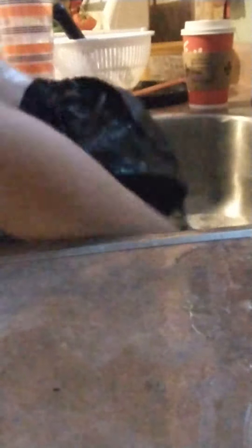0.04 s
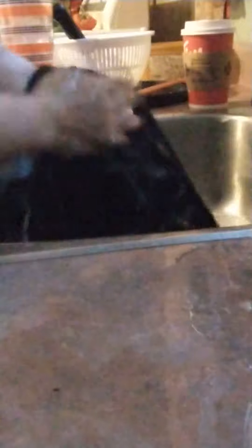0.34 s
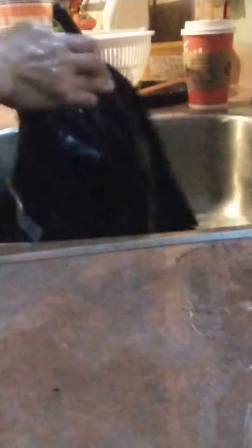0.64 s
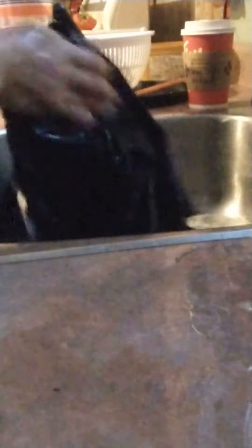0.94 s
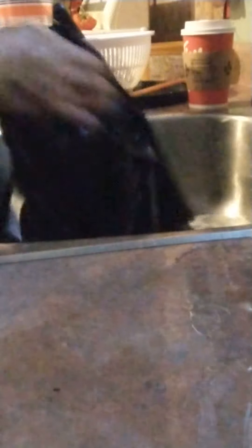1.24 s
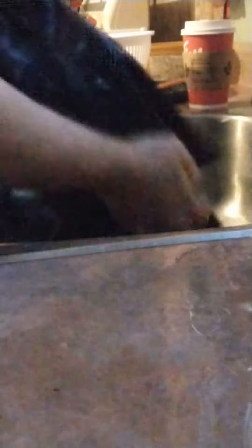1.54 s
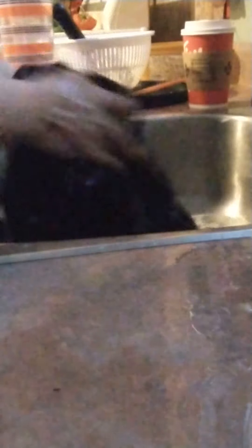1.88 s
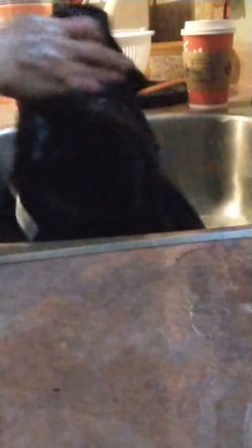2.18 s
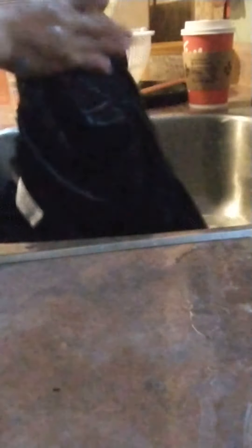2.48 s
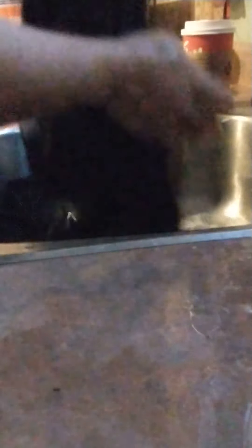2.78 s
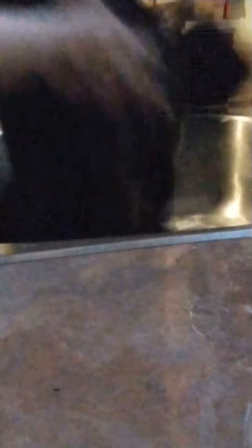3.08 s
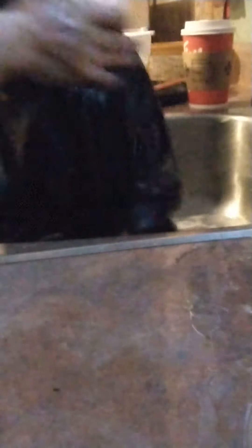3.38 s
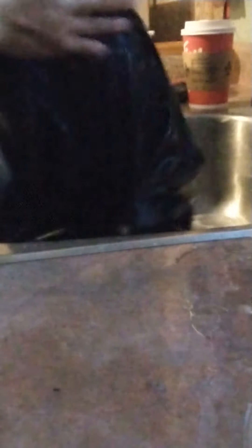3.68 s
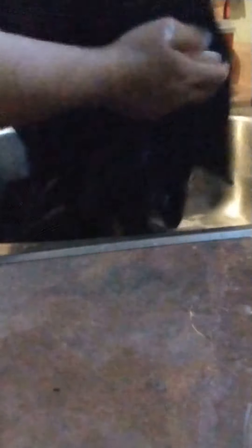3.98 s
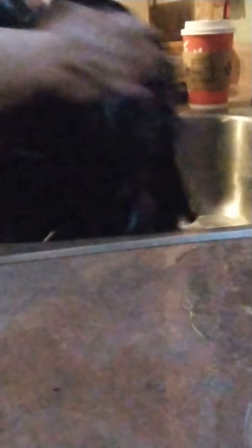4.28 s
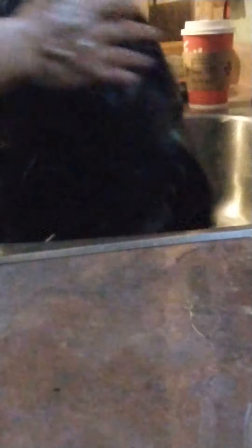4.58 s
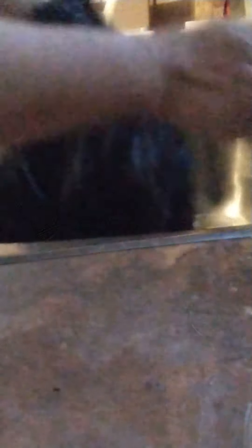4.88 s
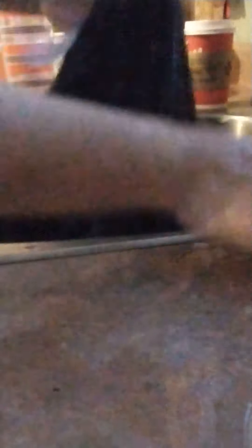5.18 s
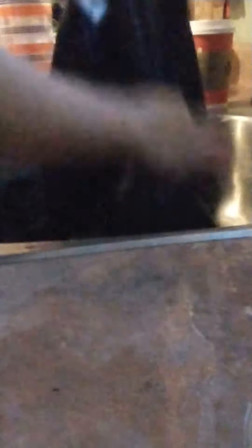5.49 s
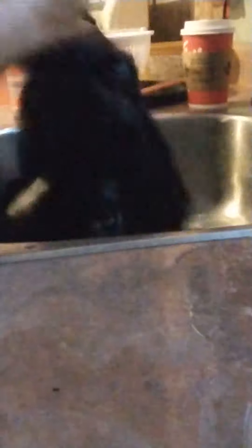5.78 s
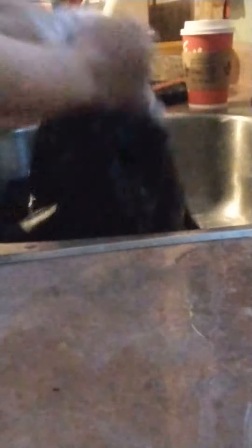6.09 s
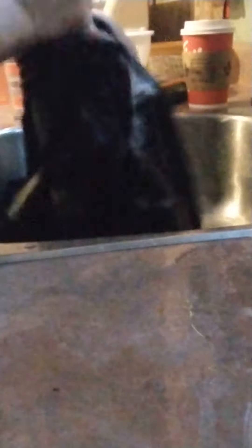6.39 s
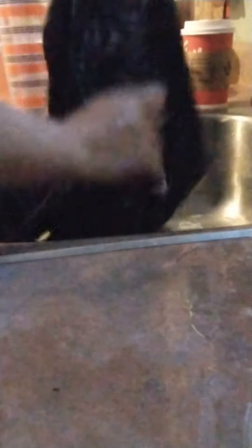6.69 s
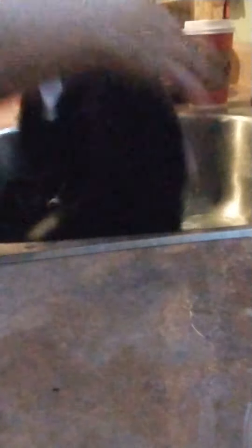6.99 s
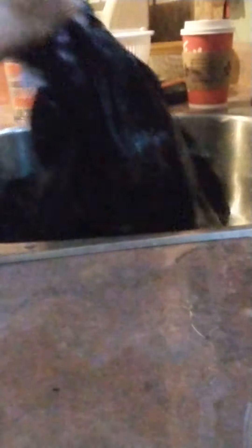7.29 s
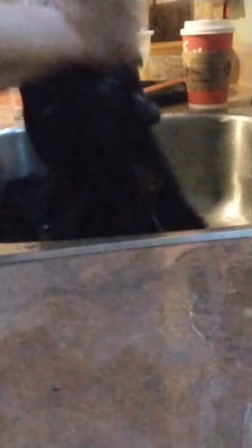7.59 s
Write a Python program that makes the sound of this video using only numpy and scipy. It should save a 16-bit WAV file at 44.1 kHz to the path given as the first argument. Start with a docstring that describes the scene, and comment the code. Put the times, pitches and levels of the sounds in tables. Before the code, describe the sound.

Close to a steel sink in a quiet kitchen, hands scrub a bundle of soapy fabric, gently at first and then more firmly. The strokes swish and squelch, water gurgles through the cloth and wet folds slap down softly. One sharp, hollow knock with a quick rattle, much louder than the washing, comes from the basin before the scrubbing resumes. An appliance hums faintly underneath.

```python
"""A steel kitchen sink, close up, where wet clothes are being rubbed by hand.
Each stroke drags soapy fibres past each other, pushes water through the weave and shifts the heavy
bundle. Suds squelch, water squirts from squeezed folds and wet cloth flops on the basin. Once, the hand
knocks something hard against the sink, where it bounces. An appliance hums in the quiet room."""
import sys
import numpy as np
from scipy import signal
from scipy.fft import rfft, irfft, next_fast_len
from scipy.io import wavfile

SR = 44100
rng = np.random.default_rng(int(sys.argv[2]) if len(sys.argv) > 2 else 0)


def wav_record(signal):
    """Record a signal, one row per channel, as 16-bit PCM in the file named by sys.argv[1]."""
    frames = np.transpose(np.atleast_2d(signal))
    bounded = np.clip(frames, -1, 1)
    # unit amplitude maps onto the largest positive 16-bit level
    quanta = np.round(bounded * 32767).astype(np.int16)
    wavfile.write(sys.argv[1], SR, quanta)


N = 346185
TIME = np.arange(N) / SR
TAPS = 2048
FREQS = np.maximum(np.arange(TAPS // 2 + 1) * SR / TAPS, 1)

# the hand draws over the cloth: at_speed_s, hold_s, rub_db, water_db
HAND_STROKES = [(-0.024, 0.18, -70, -79), (0.43, 0.017, -70.5, -85), (0.52, 0.079, -68, -80.5),
                (0.719, 0.037, -61.5, -69), (0.902, 0.005, -53.5, -67.5), (1.049, 0.035, -57.5, -71),
                (1.226, 0.0097, -57, -65.5), (1.379, 0.035, -59, -68), (1.539, 0.072, -59.5, -80),
                (1.662, 0.089, -67.5, -73.5), (1.838, 0.03, -54.5, -61), (1.989, 0.094, -58.5, -67.5),
                (2.216, 0.064, -58, -67.5), (2.384, 0.073, -60.0, -68), (2.583, 0.032, -57.0, -61.5),
                (2.743, 0.07, -58.5, -66), (2.881, 0.049, -58, -65), (3.006, 0.033, -60.5, -72),
                (3.117, 0.18, -53.5, -55), (3.389, 0.029, -50.5, -58), (3.555, 0.034, -54, -63),
                (3.743, 0.0044, -52, -58.5), (3.9, 0.18, -56, -66.5), (4.223, 0.085, -57, -61.5),
                (4.422, 0.046, -54.5, -69), (4.588, 0.045, -55, -65), (4.772, 0.12, -61, -66),
                (4.994, 0.079, -65.5, -75.0), (5.137, 0.15, -72.5, -77.5), (5.415, 0.16, -73.5, -72),
                (5.611, 0.065, -58, -63.5), (5.8, 0.2, -63, -62.5), (6.121, 0.096, -51.0, -53),
                (6.482, 0.038, -58.5, -59.0), (6.655, 0.066, -55, -58), (6.791, 0.055, -51.5, -57),
                (6.997, 0.46, -61, -66.5), (7.431, 0.18, -56, -54.5), (7.804, 0.084, -54.5, -56.5)]
# the bundle is turned or pushed along the basin: at_speed_s, hold_s, level_db
BUNDLE_HEAVES = [(0.012, 0.062, -63.5), (0.402, 0.0042, -64.5), (1.848, 0.0058, -57.5), (1.99, 0.005, -67),
                 (3.119, 0.2, -58), (3.392, 0.0035, -55.5), (4.0, 0.13, -65), (4.253, 0.065, -60),
                 (4.444, 0.056, -65), (4.61, 0.004, -59.5), (4.825, 0.005, -59), (5.003, 0.054, -63.0),
                 (5.555, 0.12, -64.5), (5.779, 0.16, -59.5), (6.049, 0.21, -69.5), (6.665, 0.03, -62.5),
                 (7.108, 0.13, -61.5)]
# suds snap in a fold: start_s, level_db, pitch_hz, width_octaves
SUDS_SQUELCHES = [(0.887, -42.5, 5500, 2), (1.538, -42, 2470, 1.5), (1.576, -43, 2380, 1.3),
                  (1.981, -45, 2900, 1), (2.636, -38.5, 4800, 1.1), (2.65, -36, 5030, 1.4),
                  (2.654, -41, 4130, 0.6), (2.68, -35.5, 3900, .6), (2.755, -41.5, 4200, 2.3),
                  (2.799, -39.5, 4160, 2.1), (2.814, -39, 4150, 0.9), (3.053, -42.5, 4530, 3.1),
                  (3.12, -33, 3160, 1.9), (3.76, -33, 4840, 1.64), (3.88, -36, 5640, 1.25),
                  (4.005, -42, 2400, 1.7), (4.291, -32.5, 4150, 2.4), (4.809, -38.5, 3900, 1.9),
                  (5.149, -59.5, 9020, 1), (5.477, -56, 5540, 1.4), (5.662, -44.5, 4500, 1.8),
                  (6.066, -45.5, 7200, 1.1), (6.104, -36, 6500, 1.1), (6.46, -46, 4500, 2.6),
                  (6.513, -41.5, 2610, 1.7), (6.818, -44, 3000, 6.6), (7.411, -40.5, 6060, 0.4)]
# soapy water leaves a squeezed fold: start_s, level_db, pitch_hz, length_s
WATER_SQUIRTS = [(0.046, -47.5, 1460, 0.034), (0.375, -56, 1640, 0.077), (1.368, -46, 3200, 0.07),
                 (1.79, -40.5, 2430, 0.097), (2.434, -42, 2560, 0.029), (3.192, -37.5, 2210, 0.11),
                 (3.711, -43, 2380, 0.056), (6.102, -33.5, 4560, 0.14), (6.796, -50, 2180, 0.095),
                 (7.436, -44.5, 6400, 0.18), (7.559, -42.5, 1980, 0.065)]
# wet folds land on the basin: start_s, level_db, pitch_hz
FOLD_FLOPS = [(0.056, -58, 444), (0.411, -48.5, 364), (1.689, -51.5, 239), (1.849, -44, 220),
              (1.986, -45, 482), (2.318, -57.5, 290), (2.447, -46, 990), (2.888, -50.5, 370),
              (3.136, -45, 120), (3.157, -48, 238), (3.24, -42.5, 210), (3.272, -36, 700),
              (3.28, -40.5, 230), (3.396, -39, 726), (4.003, -45.5, 320), (4.244, -46, 440),
              (4.287, -35.5, 700), (4.316, -48, 390), (4.82, -43.5, 540), (5.491, -45, 600),
              (5.618, -46, 378), (5.764, -40.5, 380), (5.785, -60, 360), (5.862, -43, 500),
              (6.708, -46, 330), (7.13, -43.5, 700), (7.209, -41.5, 447)]
# a hard thing hits the sink and bounces: start_s, level_db, cutoff_hz
KNOCK_CONTACTS = [(5.2308, -38, 5000), (5.2903, -26, 1500), (5.2948, -1, 7000), (5.3033, -19, 1300),
                  (5.3113, -9, 2100), (5.3510, -22, 800)]
# pitches heard in the knock, from the ringing sink and the quick bounce: pitch_hz, level_db, base_t60_s
KNOCK_RING = [(135, -22, .26), (205, -24, .22), (302, -5, .2), (358, -7, .19), (466, 2, .17), (608, 4, .19),
              (728, -6, .14), (845, -6, .13), (965, 4, .15), (1086, -5, .12), (1204, -3, .12),
              (1766, -11, .11), (2540, -8, .11), (4010, -12, .07)]
# peaks and dips of the hollow basin: centre_hz, width_hz, gain_db
BASIN_EQ = [(387, 390, 4), (625, 50, -3), (992, 226, 9), (1255, 450, 6.5), (1460, 320, -5.5),
            (2410, 480, 7.5), (3270, 520, -4.5), (4090, 420, 6.5), (4660, 460, 4), (8170, 730, 3.5)]
# the cloth muffles the steel at first, then is lifted clear: time_s, basin_share
BASIN_OPENING = [(0, .2), (.9, .35), (1.5, .7), (1.9, 1)]
# the tone of each layer: frequency_hz, level_db
FIBRE_TONE = [(400, -24.5), (1000, -9), (1700, -2), (2600, 0.5), (4200, -2.5), (6500, -4.5), (8500, -8.5),
              (11000, -12.5), (15500, -24.5)]  # bright rasp
SUDS_TONE = [(1000, -22.5), (2500, -10), (4500, 0), (8000, -6), (12000, -11), (15500, -18.5)]  # crisp top
WATER_TONE = [(350, -23), (650, -0.5), (900, 1), (1300, 4), (2000, -18), (3000, -24), (6000, -30)]  # hollow mids
BUNDLE_TONE = [(30, -30.5), (70, -11), (115, -2.5), (180, -2), (280, -1), (480, 3), (700, -1), (1100, -20),
               (2500, -35)]  # low rumble
CRACK_TONE = [(30, -74), (80, -37), (200, -31), (400, -9.5), (600, -7.5), (1000, -4), (1400, -11.5),
              (1900, -16), (2600, -8.5), (3300, -36), (4000, -15.5), (4700, -35), (7800, -38),
              (10000, -42.5), (15500, -57)]  # hard clack
AIR_TONE = [(20, -38), (32, -28), (50, -10), (80, -10), (130, -5), (170, -13.5), (215, -6.5), (340, -13.5),
            (700, -19), (1200, -24.5), (2400, -22.5), (4750, -27), (11800, -34), (15500, -32.5)]  # dark room air
# how alike left and right are: frequency_hz, likeness (clipped to 0-1)
STEREO_LIKENESS = [(60, 0.63), (400, 1), (1000, 0.65), (2000, 0), (3000, -0.4), (8000, 0.44), (15000, -2.2)]
# where the washing leans: frequency_hz, left_minus_right_db
STEREO_BALANCE = [(100, -4), (400, -1.5), (700, -1.5), (1200, 2.5), (2400, 1.5), (4400, -1.4), (15000, -2)]


def hand_strokes():
    """Each stroke rubs the fibres, squeezes water through the cloth and tugs the bundle along."""
    at_speed_s, hold_s, rub_db, water_db = np.transpose(HAND_STROKES)
    rub = effort(zip(at_speed_s, hold_s, rub_db))
    squeeze = effort(zip(at_speed_s, hold_s, water_db))
    return soapy_fibres() * rub + water_in_weave() * squeeze + shifting_bundle(rub)


def soapy_fibres():
    """Fibres rasp past each other while the foam on them pops and crackles."""
    rasp = slips(FIBRE_TONE, per_s=11000, spread_db=1.5, catch_hz=81, catch_db=1.5)
    foam = bubbles(low_hz=1900, high_hz=10500, per_s=210, cycles=20, spread_db=4, glide=0.1)
    crackle = slips(SUDS_TONE, per_s=290, spread_db=6)
    return rasp + undb(-10.5) * foam + undb(-12.5) * crackle


def water_in_weave():
    """Water pushed through the cloth sloshes and gurgles."""
    slosh = slips(WATER_TONE, per_s=3300, spread_db=2, catch_hz=100, catch_db=2)
    gurgle = bubbles(low_hz=630, high_hz=1332, per_s=80, cycles=34, spread_db=18, glide=0.095)
    return slosh + undb(-3) * gurgle


def shifting_bundle(rub):
    """The heavy wet bundle rumbles when it is heaved or dragged by a stroke."""
    heave = effort(BUNDLE_HEAVES, rise_s=0.016, fall_s=0.032)
    drag = undb(-13.5) * rub
    return slips(BUNDLE_TONE, per_s=830, spread_db=2.5) * np.hypot(heave, drag)


def effort(gestures, rise_s=0.049, fall_s=0.033):
    """Envelope of hand movements: each gathers speed, bears down most midway and runs out."""
    power = np.zeros(N)
    bear_down_db_per_s = 32.5
    for at_speed_s, hold_s, level_db in gestures:
        near = slice(max(int((at_speed_s - 0.5) * SR), 0), int((at_speed_s + hold_s + 0.5) * SR))
        since, until = TIME[near] - at_speed_s, at_speed_s + hold_s - TIME[near]
        ease_s = 0.075 * hold_s  # long movements start and stop more slowly
        fade = np.maximum(-since, 0) / (rise_s + ease_s) + np.maximum(-until, 0) / (fall_s + ease_s)
        pressure_db = bear_down_db_per_s * np.clip(np.minimum(since, until), 0, 0.06)
        power[near] += (undb(level_db + pressure_db) * np.exp(-fade ** 1.67)) ** 2
    return np.sqrt(power)


def slips(tone, per_s, spread_db, catch_hz=0, catch_db=0):
    """Tiny uneven slips and bursts in the basin; catch_db bunches them as the cloth grips and lets go."""
    fired = rng.random((2, N)) < per_s / SR
    sizes = rng.standard_normal((2, N)) * undb(spread_db * rng.standard_normal((2, N)))
    clicks = stereo(fired * sizes) * undb(catch_db * wander(catch_hz))
    covered = colour(clicks, contour(tone))
    basin_share = np.clip(np.interp(TIME, *np.transpose(BASIN_OPENING)), 0, 1)
    return basin_share * unit(colour(covered, basin_db())) + (1 - basin_share) * unit(covered)


def bubbles(low_hz, high_hz, per_s, cycles, spread_db, glide):
    """Small air pockets ring briefly, rising in pitch as they reach the surface."""
    out, t = np.zeros((2, N)), TIME[:SR // 25]
    for when, pitch, size, pan in rng.random((int(per_s * N / SR), 4)):
        hz = low_hz * (high_hz / low_hz) ** pitch
        life_s = cycles / hz
        age = t[:int(life_s * SR) + 2]
        ring = np.sin(2 * np.pi * hz * age * (1 + glide * age / life_s / 2)) * decay(age, life_s)
        sides = np.sqrt([[0.5 + pan], [1.5 - pan]])
        add(out, when * N / SR, undb(spread_db * size ** 2) * sides * ring)
    return unit(colour(out, basin_db()))


def splashes():
    """Wet accents: bright snaps of suds, swelling squirts and dull flops of folds on the basin."""
    out, t = np.zeros((2, N)), TIME[:SR // 4]
    snap = attack(t, 0.00058) * decay(t, 0.061)
    flop = attack(t, 0.0011) * decay(t, 0.049)
    for start_s, level_db, hz, octaves in SUDS_SQUELCHES:
        add(out, start_s, undb(level_db) * spurt(snap, hz, octaves, skirt_db=-37))
    for start_s, level_db, hz, length_s in WATER_SQUIRTS:
        swell = np.sin(np.pi * np.minimum(t / length_s, 1)) ** 2
        add(out, start_s, undb(level_db) * spurt(swell, hz, octaves=0.94, skirt_db=-37))
    for start_s, level_db, hz in FOLD_FLOPS:
        add(out, start_s, undb(level_db) * spurt(flop, hz, octaves=2.27, skirt_db=-38.5))
    return out


def spurt(envelope, hz, octaves, skirt_db):
    """Water films burst together in a puff of noise around one pitch, peak 1."""
    fizz = stereo_noise(len(envelope)) * envelope
    band_db = skirt_db * (1 - np.exp(-(np.log2(FREQS / hz) / octaves) ** 2))
    sound = colour(fizz, band_db + basin_db())
    return sound / np.abs(sound).max()


def sink_knock():
    """Each contact on the cloth-damped sink cracks, rings and sets off a dense rattle in the counter."""
    out, t = np.zeros((2, N)), TIME[:SR // 2]
    # levels as [left, right]
    crack_db, ring_db, rattle_db = [[-1.5], [-9.5]], [[-30.5], [-34.5]], [[-22.5], [-28.5]]
    cloth_damping = 0.8
    crack = colour(signal.unit_impulse(len(t)), contour(CRACK_TONE))
    crack /= np.abs(crack).max()
    ring = sum(undb(level_db) * np.cos(2 * np.pi * hz * t) * decay(t, base_t60_s * cloth_damping)
               for hz, level_db, base_t60_s in KNOCK_RING)
    ring *= attack(t, 0.0054)  # the ring blooms just after the crack
    for start_s, level_db, cutoff_hz in KNOCK_CONTACTS:
        rattle = unit(colour(stereo_noise(len(t)), contour(CRACK_TONE))) * decay(t, 0.13)
        blow = undb(crack_db) * crack + undb(ring_db) * ring + undb(rattle_db) * rattle
        softness_db = -10 * np.log10(1 + (FREQS / cutoff_hz) ** 4)  # a softer contact loses its treble
        add(out, start_s, undb(level_db) * colour(blow, softness_db))
    return from_right(out, delay_samples=7)


def basin_db():
    """The basin's resonances and hollows as an EQ curve over FREQS."""
    return sum(db / (1 + (2 * (FREQS - hz) / width_hz) ** 2) ** 2 for hz, width_hz, db in BASIN_EQ)


def kitchen(sound, wet_db, t60_s):
    """Cupboards and walls add a short wash of reflections."""
    t = TIME[:SR // 2]
    tail = stereo_noise(len(t)) * decay(t, t60_s) * attack(t, 0.0037)
    tail /= np.sqrt(np.sum(tail ** 2) / 2)
    tail = colour(tail, contour([(300, -3), (2500, -0.5), (10000, 3.5)]))
    return sound + undb(wet_db) * signal.oaconvolve(sound, tail, axes=1)[:, :N]


def room_tone(air_db=-72.5, hum_hz=59.3, hum_db=-82.5):
    """A bed of faint steady air and the low, wavering hum of an appliance."""
    air = unit(colour(stereo_noise(N), contour(AIR_TONE)))
    hum = np.sqrt(2) * np.sin(2 * np.pi * hum_hz * TIME)
    return undb(air_db) * air + undb(hum_db + 1.2 * wander(5)) * hum


def stereo(pair):
    """Blend two unrelated signals into left and right: alike in the bass, wide in the treble."""
    n = pair.shape[1]
    size = next_fast_len(n)
    bin_hz = np.arange(size // 2 + 1) * SR / size
    alike = np.interp(bin_hz, FREQS, np.clip(contour(STEREO_LIKENESS), 0, 1))
    weights = np.sqrt([(1 + alike) / 2, (1 - alike) / 2])
    mid, side = irfft(rfft(pair, size) * weights, size)[:, :n]
    return np.array([mid + side, mid - side])


def stereo_noise(samples):
    """White noise with the scene's stereo width."""
    return stereo(rng.standard_normal((2, samples)))


def from_right(pair, delay_samples):
    """Sound from the right reaches the left channel late."""
    late_left = np.pad(pair[0], (delay_samples, 0))[:pair.shape[1]]
    return np.array([late_left, pair[1]])


def colour(sound, curve_db):
    """Minimum-phase EQ with the given curve over FREQS."""
    cepstrum = irfft(np.log(undb(curve_db)))
    cepstrum[1:TAPS // 2] *= 2
    cepstrum[TAPS // 2 + 1:] = 0
    response = irfft(np.exp(rfft(cepstrum)))
    return signal.oaconvolve(np.atleast_2d(sound), response[None], axes=1)[:, :np.shape(sound)[-1]]


def contour(points):
    """Join (frequency_hz, value) points on a log-frequency axis."""
    hz, value = np.transpose(points)
    return np.interp(np.log(FREQS), np.log(hz), value)


def attack(t, rise_s):
    """Fade in with time constant rise_s."""
    return 1 - np.exp(-t / rise_s)


def decay(t, t60_s):
    """Fade out by 60 dB every t60_s."""
    return np.exp(-np.log(1000) * t / np.maximum(t60_s, 1e-3))


def wander(rate_hz):
    """Smooth random drift with a spread near 1."""
    return np.interp(TIME * rate_hz, np.arange(4096), rng.standard_normal(4096))


def add(out, start_s, sound):
    """Mix a short sound in at start_s."""
    i = max(int(start_s * SR), 0)
    out[:, i:i + sound.shape[1]] += sound[:, :N - i]


def undb(db):
    """Decibels to gain."""
    return 10 ** (np.asarray(db) / 20)


def unit(sound):
    """Scale to rms 1."""
    return sound / np.sqrt(np.mean(sound ** 2))


def scene():
    """The washing and one drier knock sit in the kitchen, over the room tone."""
    left, right = hand_strokes() + splashes()
    lean_db = contour(STEREO_BALANCE) / 2
    washing = np.vstack([colour(left, lean_db), colour(right, -lean_db)])
    washing = kitchen(from_right(washing, delay_samples=12), wet_db=-11, t60_s=0.35)
    knock = kitchen(sink_knock(), wet_db=-26, t60_s=0.25)
    return washing + knock + room_tone()


def record(dry):
    """A steep low-pass cuts the very top."""
    top_hz = 15750
    return signal.sosfilt(signal.ellip(10, 0.2, 70, top_hz, fs=SR, output="sos"), dry)


dry = scene()
out = record(dry)
wav_record(out)
```